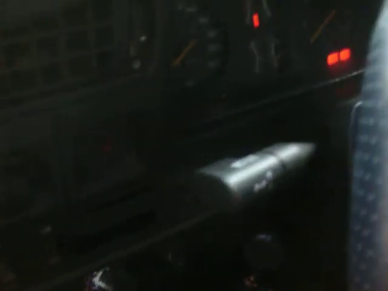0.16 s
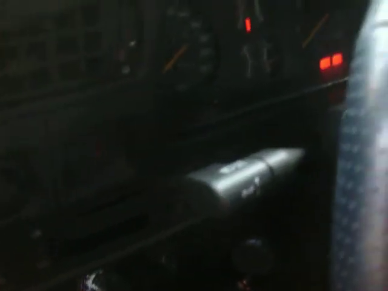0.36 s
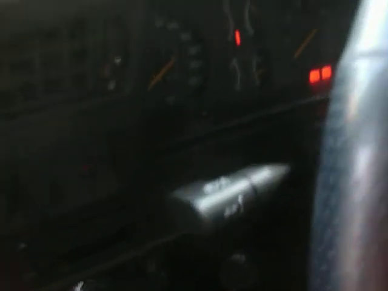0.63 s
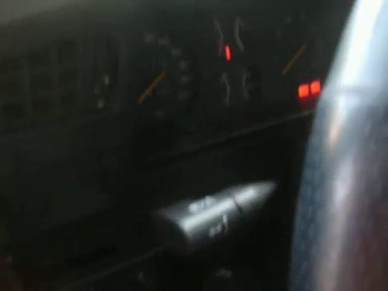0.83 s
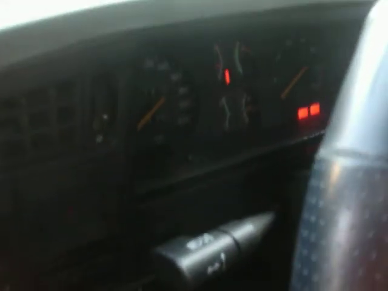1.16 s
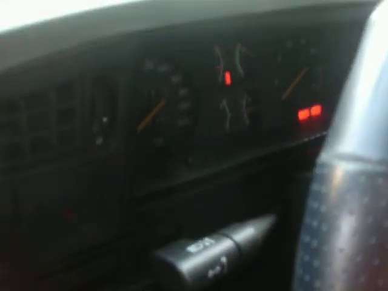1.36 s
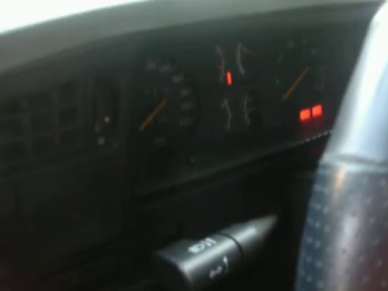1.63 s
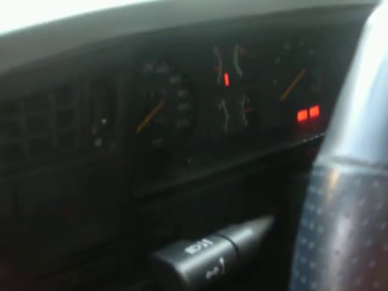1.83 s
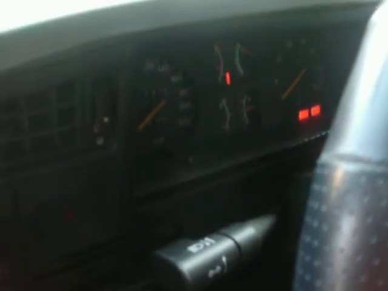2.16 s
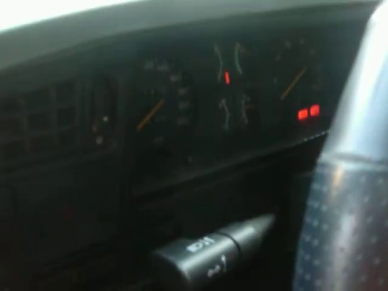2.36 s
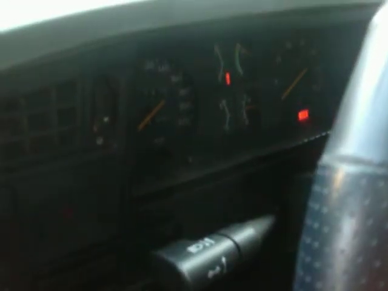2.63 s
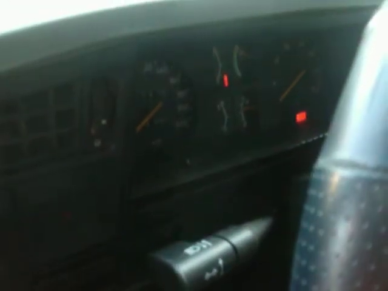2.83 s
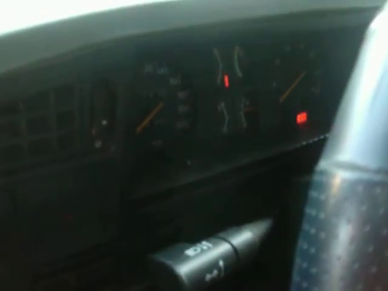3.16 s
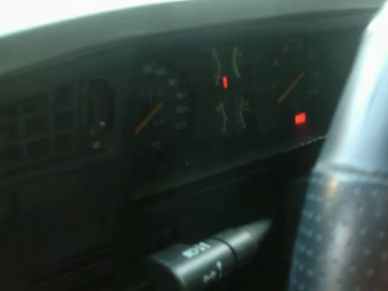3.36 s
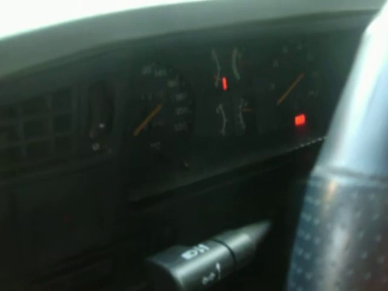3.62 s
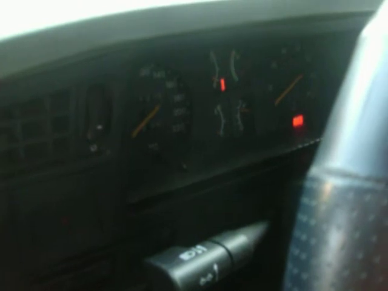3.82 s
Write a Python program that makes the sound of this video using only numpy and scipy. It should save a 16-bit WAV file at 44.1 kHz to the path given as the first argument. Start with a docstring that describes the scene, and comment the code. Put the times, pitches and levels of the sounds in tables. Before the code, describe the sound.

A car engine cranks and fires with a rough growl, after a hand shuffles keys and bumps the dashboard while a pump whines quietly. The sound is close and slightly muffled, through a small microphone in the cabin.

```python
"""Inside a parked car, near the dashboard: a pump whines while a hand shuffles keys and knocks the trim.
At 2.2 s the starter engages and labours over each compression stroke.
At 3.2 s the engine catches with a rough boom; the pinion squeals free and a thin whirr rises.
Throughout, a small camera microphone dulls the treble and clips the loudest peaks."""
import sys
import numpy as np
from scipy import signal
from scipy.fft import rfft, irfft
from scipy.io import wavfile
from scipy.ndimage import uniform_filter1d

SR = 44100
rng = np.random.default_rng(int(sys.argv[2]) if len(sys.argv) > 2 else 0)


def store_wav(level_fs):
    """Save 16-bit WAV to argv[1]."""
    pcm = np.round(np.clip(np.atleast_2d(level_fs), -1, 1) * 32767)
    wavfile.write(sys.argv[1], SR, pcm.T.astype(np.int16))


N = 176400
CONTACTS_PER_S = 5000
# modes of the key bunch: f/Hz, level/dB
KEY_MODES = [(1600, -8), (2050, -7), (2450, -2), (2680, 4.5), (2970, 5.5), (3360, -1.5), (3850, -3.5),
             (4300, -2), (4700, -2.5), (5200, -13.5), (5700, -20)]


def undb(db):
    return 10 ** (np.asarray(db) / 20)


def unit(x):
    return x / np.sqrt(np.mean(x ** 2))


def column(table, index):
    """Column of a time table, interpolated per sample."""
    rows = np.array(table)
    return np.interp(np.arange(N) / SR, rows[:, 0], rows[:, index])


def ramp(start_s, rise_s):
    return np.clip((np.arange(N) / SR - start_s) / rise_s, 0, 1)


def colour(x, points):
    """Filter x by (f/Hz, gain/dB) points; rms 1."""
    hz, db = np.array(points).T
    bins_hz = np.maximum(np.arange(N // 2 + 1) * SR / N, 1)
    gain = undb(np.interp(np.log(bins_hz), np.log(hz), db))
    return unit(irfft(rfft(x) * gain, N))


def resonate(x, hz, width_hz):
    return signal.lfilter(*signal.iirpeak(hz, hz / width_hz, fs=SR), x)


def walk(rate_hz):
    """Smooth random drift; rms 1."""
    hold = int(SR / rate_hz)
    steps = np.repeat(rng.standard_normal(N // hold + 1), hold)
    return unit(uniform_filter1d(uniform_filter1d(steps, hold), hold)[:N])


def clicks(per_s, spread_db, size=N):
    """Random clicks, a few much stronger."""
    hits = rng.random(size) < per_s / SR
    return hits * rng.standard_normal(size) * undb(spread_db * rng.exponential(size=size))


def add(out, start_s, x):
    i = int(start_s * SR)
    out[i:i + len(x)] += x[:N - i]


def cabin():
    """Quiet cabin air, faint rumble, and a pump's wavering whine and hiss."""
    # air spectrum: f/Hz, relative density/dB
    air_spectrum = [(15, -36.5), (25, -28.5), (90, -2), (143, -4.5), (172, -9.5), (206, -2), (1070, -10),
                    (2190, -25.5), (2750, -32.5), (3970, -27), (6000, -38), (7800, -90.5)]
    # pump tones: f/Hz, rms level/dB
    pump_tones = [(1104, -50), (2772, -54), (2837, -48.5), (2902, -63), (3838, -57.5)]
    t = np.arange(N) / SR
    air = colour(rng.standard_normal(N), air_spectrum) * undb(-31 + 2.8 * walk(9.7))
    whine = sum(np.sqrt(2) * undb(db + 2.5 * walk(12)) * np.sin(2 * np.pi * hz * t)
                for hz, db in pump_tones)
    rumble = undb(-46.5 + 3 * walk(7.4)) * unit(resonate(rng.standard_normal(N), hz=35, width_hz=46))
    hiss = undb(-46.5) * unit(resonate(rng.standard_normal(N), hz=2850, width_hz=480))
    return air + rumble + whine + hiss


def bumps():
    """Soft low thuds through the camera body."""
    # thuds: t/s, level/dB, f/Hz, t60/s
    thuds = [(0.209, -29, 61.3, 0.11), (0.375, -19, 105, 0.091), (0.589, -29, 94.2, 0.11),
             (0.688, -30, 94, 0.086), (0.828, -9, 154, 0.03), (0.904, -10.5, 172, 0.032),
             (1.041, -18, 234, 0.02), (1.287, -35, 63.4, 0.078), (1.687, -18, 160, 0.066)]
    out, t = np.zeros(N), np.arange(8192) / SR
    attack = np.minimum(t / .002, 1)
    for start_s, db, hz, t60_s in thuds:
        add(out, start_s, undb(db) * np.sin(2 * np.pi * hz * t) * 1000 ** (-t / t60_s) * attack)
    return out


def rustle():
    """Many faint contacts among the keys while the hand moves."""
    # rustle envelope: t/s, level/dB
    envelope = [(0.0, -27.5), (0.12, -50.5), (0.272, -47.5), (0.716, -43), (1.02, -57), (1.15, -49)]
    contacts = clicks(CONTACTS_PER_S, spread_db=1.2)
    ring = sum(undb(db) * resonate(contacts, hz, width_hz=460) for hz, db in KEY_MODES)
    fade_out = np.clip((envelope[-1][0] - np.arange(N) / SR) / .13, 0, 1)
    return fade_out * undb(column(envelope, 1) + 2 * walk(34)) * unit(ring)


def keys():
    """Each touch is a scrape of tiny contacts that rings trim and keys; the struck key stands out."""
    # touches: t/s, knock peak/dB, jingle peak/dB, struck key f/Hz, scrape length/s
    touches = [(0.003, -10, -22, 2940, 0.0035), (0.024, -11.5, -19, 2880, 0.0061),
               (0.045, -18.5, -19.5, 2580, 0.004), (0.069, -4.5, -14.5, 2520, 0.0036),
               (0.089, -16, -59, 2670, 0.0029), (0.151, -23.5, -30, 4300, 0.0071),
               (0.167, -17.5, -17.5, 4250, 0.005), (0.181, -16.5, -13, 2770, 0.0056),
               (0.19, -27, -19.5, 4260, 0.008), (0.209, -21, -18.5, 2650, 0.0098),
               (0.236, -16, -20.5, 2030, 0.022), (0.262, -16, -18.5, 3170, 0.017),
               (0.271, -20.5, -31, 2020, 0.011), (0.322, -18.5, -27.5, 2800, 0.0038),
               (0.345, -26, -32, 2780, 0.0025), (0.382, -26.5, -21, 2570, 0.0053),
               (0.401, -18.5, -13, 2610, 0.0055), (0.439, -18.5, -37, 2880, 0.0059),
               (0.494, -21.5, -24, 2010, 0.0043), (0.517, -3.5, -15, 2760, 0.0025),
               (0.568, -9.5, -18.5, 3050, 0.0064), (0.602, -14.5, -28.5, 3050, 0.0033),
               (0.616, -8, -24, 2810, 0.0044), (0.627, -20.5, -13.5, 2980, 0.0054),
               (0.678, -7.5, -14.5, 2580, 0.0058), (0.723, -37, -29.5, 2930, 0.0035),
               (0.745, -23.5, -37, 3100, 0.0043), (0.764, -19, -13.5, 2690, 0.0043),
               (0.793, -14.5, -39, 2880, 0.0042), (0.808, -13.5, -31, 2950, 0.0078),
               (0.827, -23, -21, 4400, 0.007), (0.88, -26, -26, 2630, 0.0049),
               (0.926, -35, -31.5, 2720, 0.0039), (0.975, -31, -31.5, 2860, 0.0037),
               (0.996, -36, -28, 2550, 0.0042), (1.021, -20.5, -26, 2870, 0.014),
               (1.032, -12.5, -32.5, 3010, 0.0047), (1.057, -18.5, -45, 2770, 0.016),
               (1.259, -42, -29, 2860, 0.014), (1.364, -15.5, -41, 2780, 0.0046),
               (1.482, -29, -38, 2740, 0.0042), (1.772, -39, -20, 2850, 0.0092),
               (1.804, -60, -21.5, 3000, 0.013), (1.895, -15, -34, 2870, 0.01),
               (1.911, -9, -31, 2860, 0.0074), (1.931, -9.5, -20, 2990, 0.011),
               (1.966, -20, -28, 2550, 0.0088), (2.039, -24, -35, 2780, 0.0048),
               (2.063, -25, -46, 2800, 0.0066), (2.075, -45, -29.5, 2080, 0.0036),
               (2.131, -23.5, -21, 2810, 0.0078)]
    # trim modes: f/Hz, level/dB
    trim_modes = [(470, -20), (690, -12), (810, 0), (900, -11), (1300, -24)]
    struck_db, scatter_db, detune, trim_lag_s = 6, 2, .018, .002
    out, t = np.zeros(N), np.arange(4096) / SR

    def excite(scrape, modes, t60_s):
        ring = 0
        for hz, db in modes:
            gain = undb(db + scatter_db * rng.standard_normal())
            ring += gain * np.sin(2 * np.pi * hz * t * (1 + detune * rng.standard_normal()))
        hit = signal.fftconvolve(scrape, ring * 1000 ** (-t / t60_s))[:len(t)]
        return hit / np.sqrt(2 * uniform_filter1d(hit ** 2, size=256).max())

    for start_s, knock_db, jingle_db, struck_hz, length_s in touches:
        age = t / max(length_s, .002)
        scrape = clicks(CONTACTS_PER_S, spread_db=2.5, size=len(t)) * age * np.exp(-1.5 * age)
        knock = excite(scrape, trim_modes, t60_s=.05)
        jingle = excite(scrape, KEY_MODES + [(struck_hz, struck_db)], t60_s=.022)
        add(out, start_s + trim_lag_s, undb(knock_db) * knock)
        add(out, start_s, undb(jingle_db) * jingle)
    return signal.sosfilt(signal.butter(2, 300, "high", fs=SR, output="sos"), out)


def whirr():
    """Thin low tone, climbing as the revs settle."""
    # glide: t/s, f/Hz, rms level/dB
    glide = [(3.8, 216.7, -21), (3.904, 248.7, -14), (3.984, 266.6, -18.5), (4.0, 277, -37)]
    cycles = np.cumsum(column(glide, 1)) / SR
    fade_in = ramp(glide[0][0], rise_s=.03)
    return fade_in * np.sqrt(2) * undb(column(glide, 2)) * np.sin(2 * np.pi * cycles)


def squeal():
    """Thin squeal as the pinion lets go."""
    start_s, length_s, hz = 3.41, .14, 2490
    swell = np.sin(np.pi * ramp(start_s, length_s))
    return swell * 2 * undb(-41) * np.sin(2 * np.pi * hz * np.arange(N) / SR)


def starter():
    """Pinion on ring gear: rough rush and unsteady tooth whine; bass enters once the flywheel turns."""
    # cranking: t/s, level/dB, tooth rate/Hz
    cranking = [(2.168, -34, 700), (2.178, -19.5, 760), (2.198, -13.5, 770), (2.214, -11.5, 758),
                (2.234, -18.5, 710), (2.36, -20, 800), (2.5, -16, 885), (2.66, -16, 880), (2.7, -20.5, 800),
                (2.76, -15.5, 770), (2.82, -18, 800), (2.9, -16, 830), (2.96, -16, 800), (3.08, -20.5, 800),
                (3.2, -17.5, 830), (3.3, -16, 850), (3.58, -19, 690), (3.9, -17, 792.5), (4.0, -19.5, 769)]
    # gear noise spectrum: f/Hz, relative density/dB
    gear_spectrum = [(24, -21), (40, -16.5), (96, -5), (141, -18.5), (312, -13.5), (623, -10.5),
                     (872, -9.5), (2100, -26.5), (2440, -25), (4870, -31), (6000, -39.5), (7800, -66.5)]
    bass_hz, whine_db, jitter = 150, -8, .02
    rush = colour(clicks(per_s=9000, spread_db=1), gear_spectrum) * undb(walk(25))
    bass = signal.sosfiltfilt(signal.butter(2, bass_hz, fs=SR, output="sos"), rush)
    rush -= bass * (1 - ramp(start_s=2.21, rise_s=.05))
    teeth = np.cumsum(column(cranking, 2) * (1 + jitter * walk(60))) / SR
    whine = undb(whine_db + 2 * walk(30)) * np.sin(2 * np.pi * teeth)
    engaged = np.arange(N) / SR > cranking[0][0]
    return engaged * undb(column(cranking, 1)) * (rush + whine)


def strokes():
    """The gear binds at each compression: a first blow, one per shaft turn and grinding shake the block."""
    # compressions: t/s, level/dB, hold/s, fade/(dB/s), first blow re shaft blows/dB
    compressions = [(2.213, -13.5, 0.014, 74.5, 8), (2.394, -17, 0.043, 96, -0.5),
                    (2.455, -14, 0.04, 257, 2), (2.609, -12.5, 0.022, 257, 8),
                    (2.715, -13.5, 0.038, 200, 6), (2.843, -11.5, 0.046, 216.5, 2),
                    (2.982, -10.5, 0.0095, 246, 7.5), (3.112, -11, 0.049, 285, 2),
                    (3.336, -14.5, 0.024, 126.5, 9), (3.431, -17.5, 0.01, 265, 8)]
    # engine block modes: f/Hz, width/Hz, level/dB
    block_modes = [(175, 90, -5), (258, 42, 2), (340, 55, -1), (480, 200, -11), (740, 130, -6),
                   (860, 130, -6), (1300, 250, -7), (1590, 110, -11), (1850, 200, -12), (3500, 2500, -20)]
    shaft_hz, jitter, scatter_db = 85, .04, 2.5
    attack_s, soften_hz, grind_db = .004, 800, -2

    def block(x):
        return sum((-1) ** k * undb(db) * resonate(x, hz, width_hz) * np.sqrt(100 / width_hz)
                   for k, (hz, width_hz, db) in enumerate(block_modes))

    t, load = np.arange(N) / SR, np.zeros(N)
    turns = np.cumsum(shaft_hz * (1 + jitter * walk(40)) / SR).astype(int)
    blows = np.diff(turns, prepend=0) * undb(scatter_db * rng.standard_normal(N))
    for start_s, db, hold_s, fade_db_per_s, blow_db in compressions:
        load += ramp(start_s, attack_s) * undb(db - fade_db_per_s * np.maximum(t - start_s - hold_s, 0))
        blows[int((start_s + attack_s) * SR)] = undb(blow_db)
    soft_blows = signal.lfilter(*signal.butter(1, soften_hz, fs=SR), unit(blows))
    force = soft_blows + undb(grind_db) * unit(clicks(per_s=3000, spread_db=1))
    return block(force * load) / np.std(block(force))


def engine():
    """Firings boom in the cabin; each releases a puff of growl."""
    # run-up: t/s, firing rate/Hz, boom level/dB, growl level/dB
    run_up = [(3.22, 38.3, -46, -9), (3.262, 37.3, -12.5, -24), (3.338, 37.5, -44, 7.5),
              (3.394, 41, -16, -20.5), (3.436, 43.7, -23.5, -13.5), (3.488, 43.9, -16.5, -21.5),
              (3.532, 43.1, -29.5, -14.5), (3.564, 42.9, -23, -17), (3.632, 43.8, -13, -13.5),
              (3.684, 44, -37, -12.5), (3.724, 47.5, -14, -13), (3.774, 48.6, -21, -11),
              (3.852, 50, -20, -20.5), (3.872, 47.2, -28, -12), (3.916, 47.5, -16.5, -14.5),
              (3.95, 49.1, -37, -14.5), (3.976, 48, -15, -13), (4.0, 46, -39, -18)]
    # growl spectrum: f/Hz, relative density/dB
    growl_spectrum = [(35, -22), (60, -13), (140, -6.5), (250, -3), (297, -6), (550, -9), (606, -15.5),
                      (707, -9), (1850, -26.5), (2160, -32), (5140, -32), (6000, -41.5), (7800, -70.5)]
    jitter, puff_depth, decay_cycles = .12, .29, .75
    firings = np.cumsum(column(run_up, 1) * (1 + jitter * walk(18))) / SR
    strength = undb(-rng.standard_normal(400))[firings.astype(int)]  # 1 dB scatter per firing
    boom = np.sqrt(2) * np.sin(2 * np.pi * firings) * undb(column(run_up, 2))
    puffs = strength * (1 - puff_depth + puff_depth * 2 * np.exp(-(firings % 1) / decay_cycles))
    growl = colour(puffs * rng.standard_normal(N), growl_spectrum) * undb(column(run_up, 3))
    return ramp(run_up[0][0], rise_s=.091) * boom + ramp(start_s=3.34, rise_s=.06) * growl


def scene():
    return (keys() + rustle() + bumps() + cabin() + strokes() + starter() + squeal()
            + engine() + whirr())[None]


def record(dry):
    """Microphone stage: treble loss, clipping with a tight knee, top cut."""
    treble_stop_hz, ceiling, knee, top_hz = 6450, .71, 40, 15800
    dull = signal.sosfilt(signal.cheby2(16, 70, treble_stop_hz, fs=SR, output="sos"), dry)
    clipped = dull / (1 + (dull / ceiling) ** knee) ** (1 / knee)
    return signal.sosfilt(signal.ellip(8, .2, 70, top_hz, fs=SR, output="sos"), clipped)


dry = scene()
out = record(dry)
store_wav(out)
```